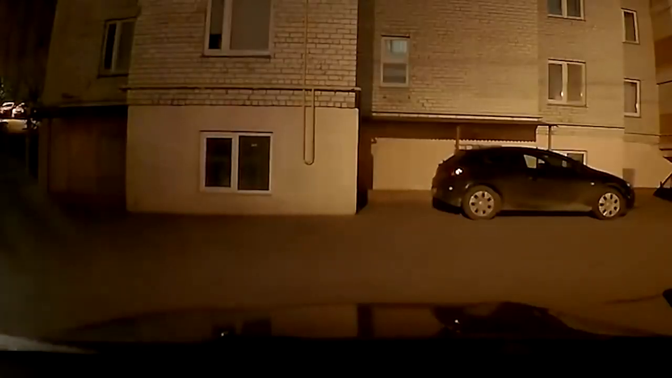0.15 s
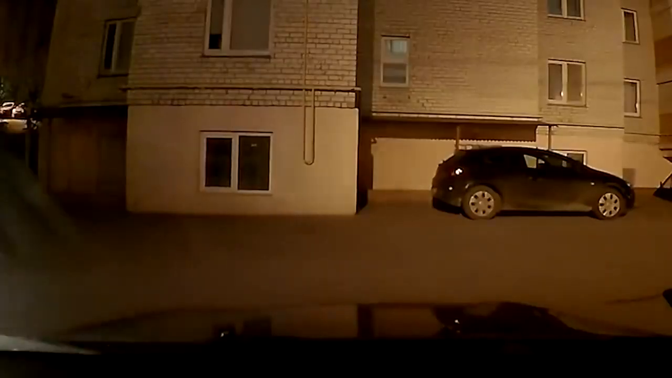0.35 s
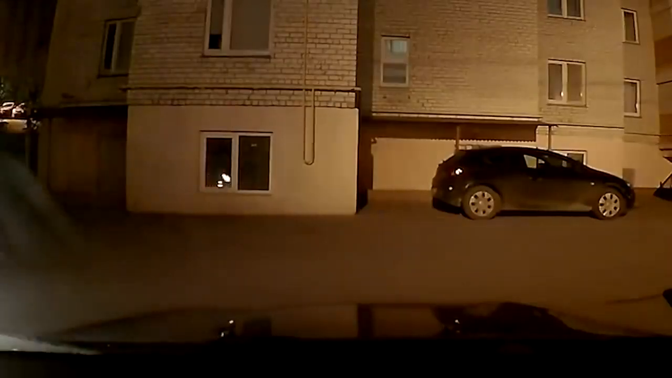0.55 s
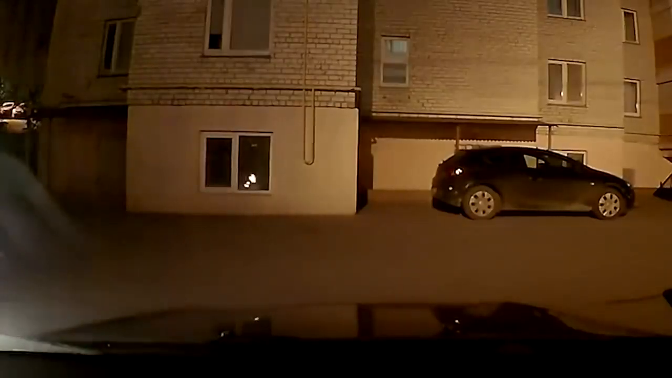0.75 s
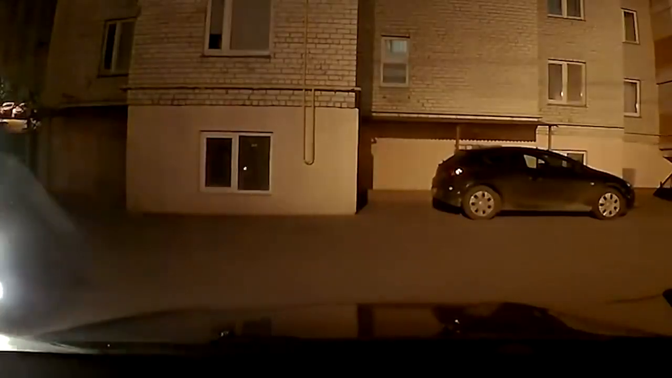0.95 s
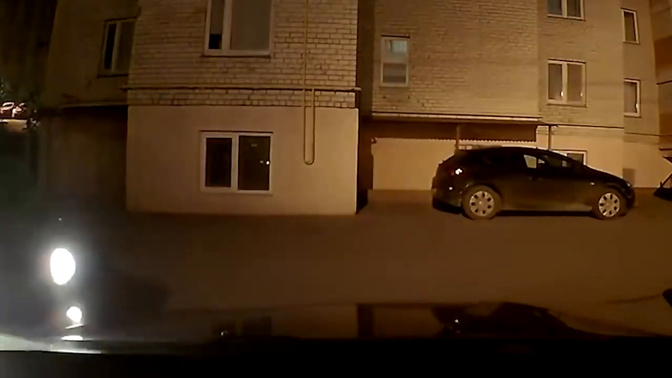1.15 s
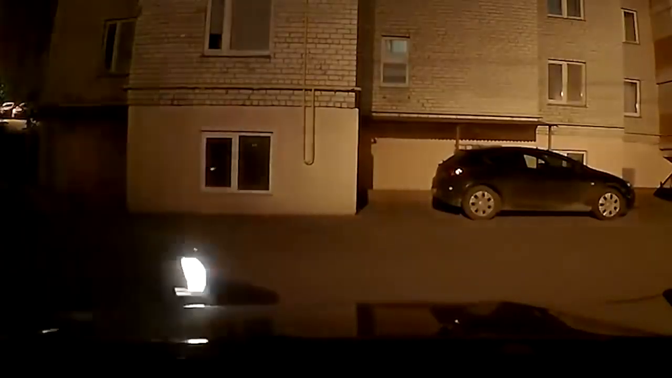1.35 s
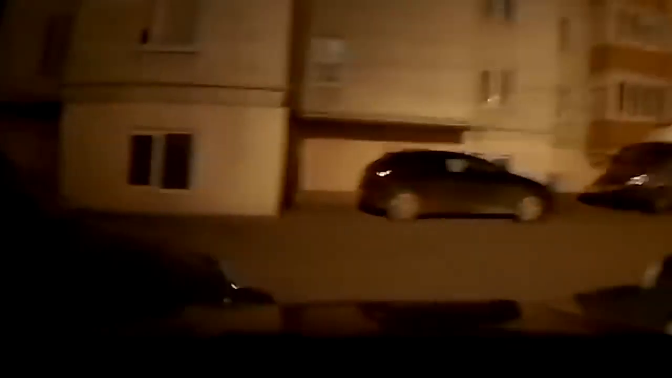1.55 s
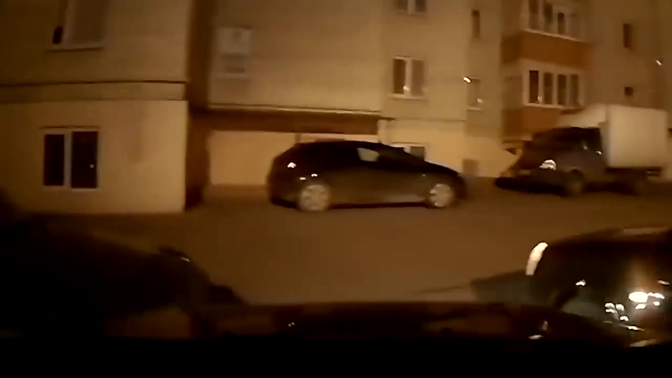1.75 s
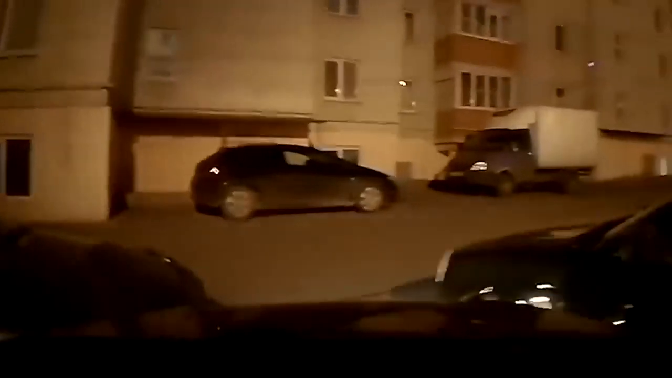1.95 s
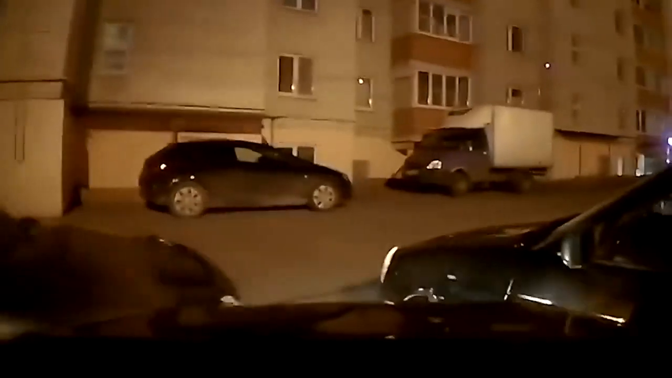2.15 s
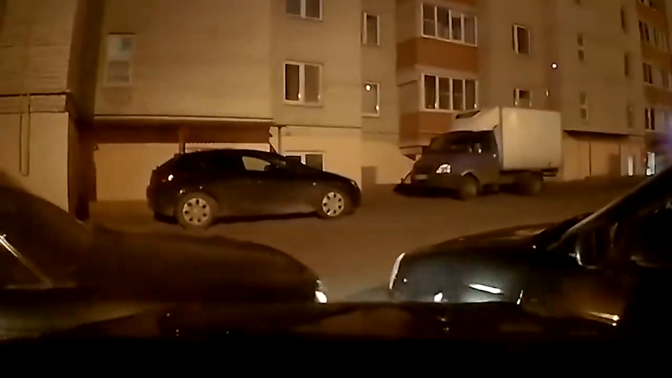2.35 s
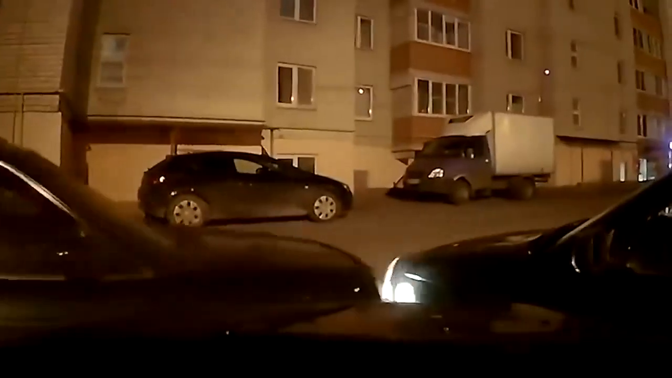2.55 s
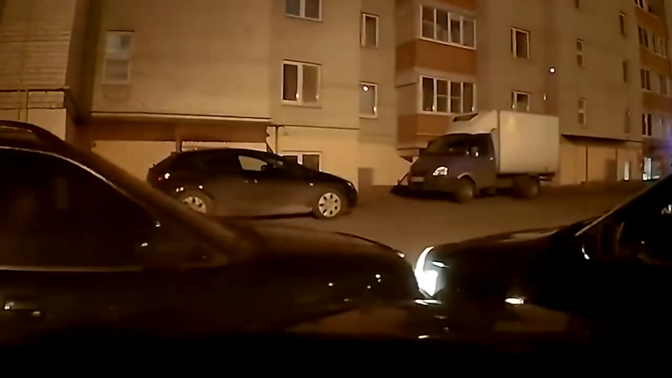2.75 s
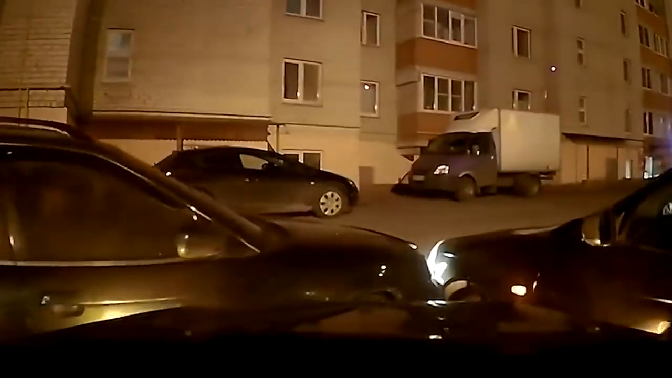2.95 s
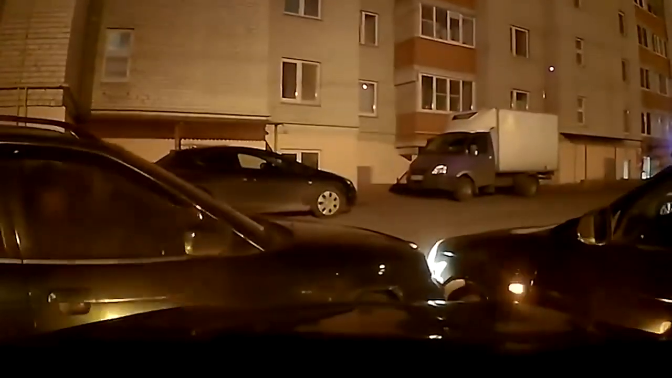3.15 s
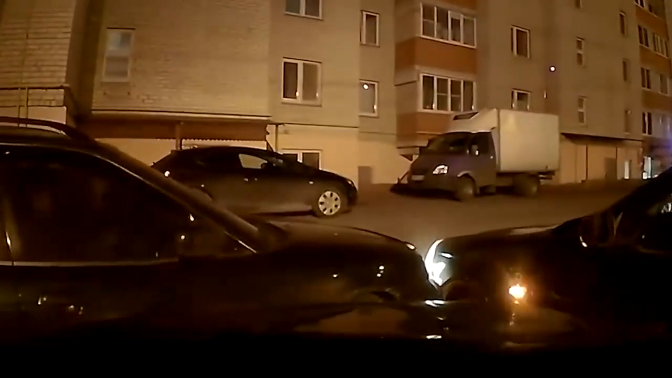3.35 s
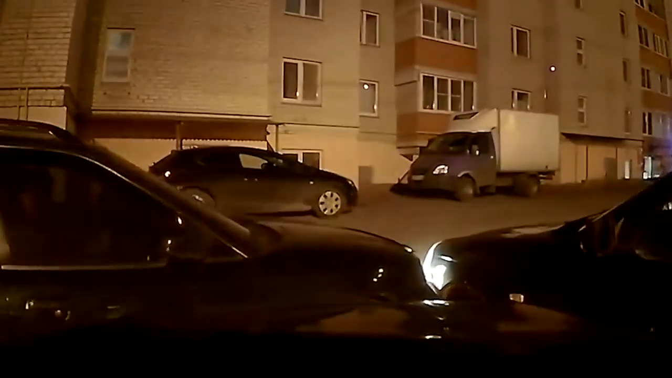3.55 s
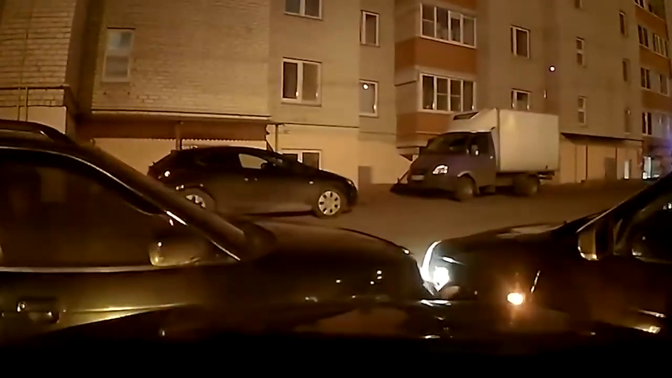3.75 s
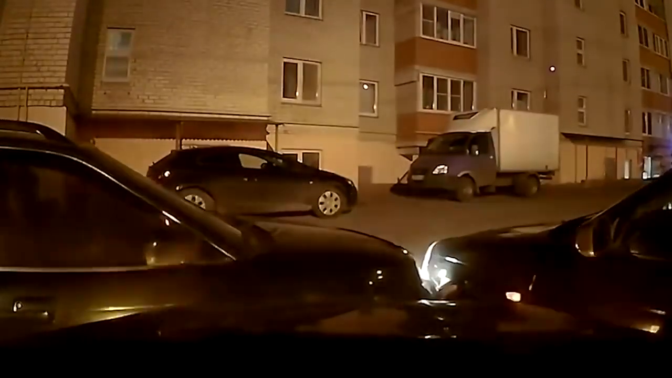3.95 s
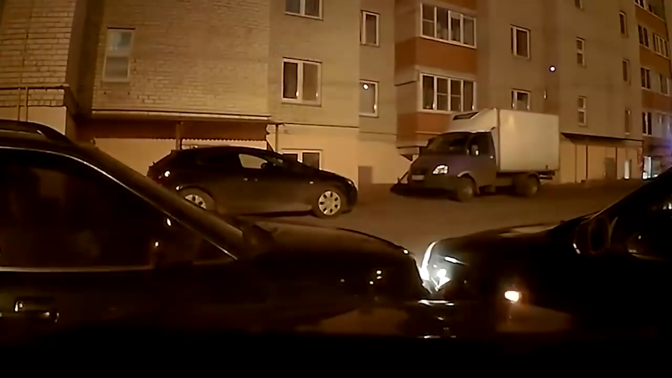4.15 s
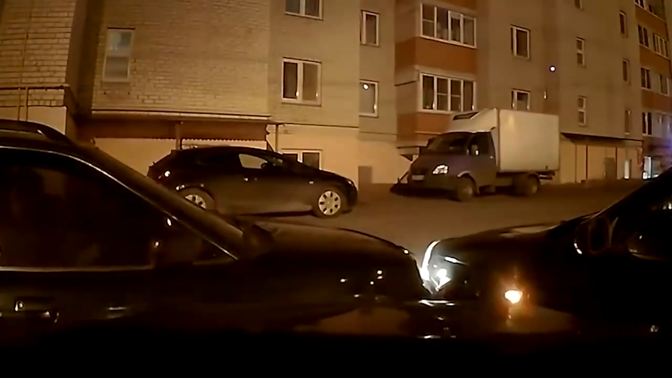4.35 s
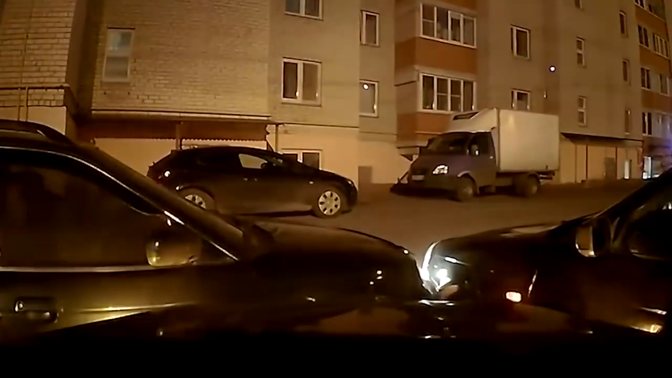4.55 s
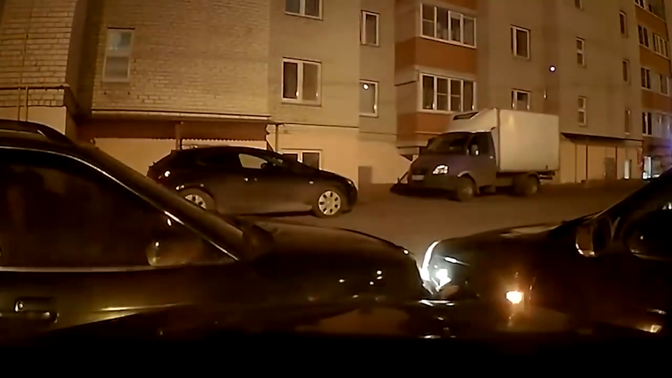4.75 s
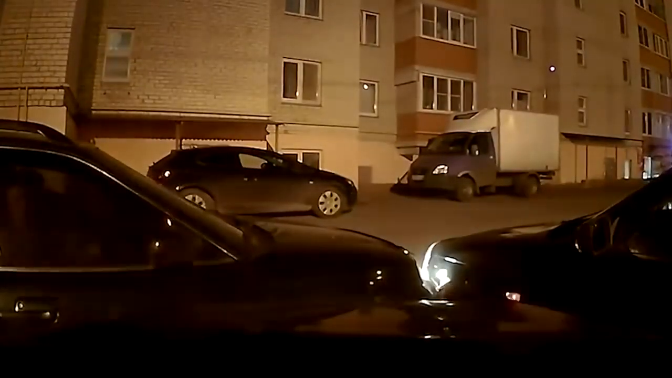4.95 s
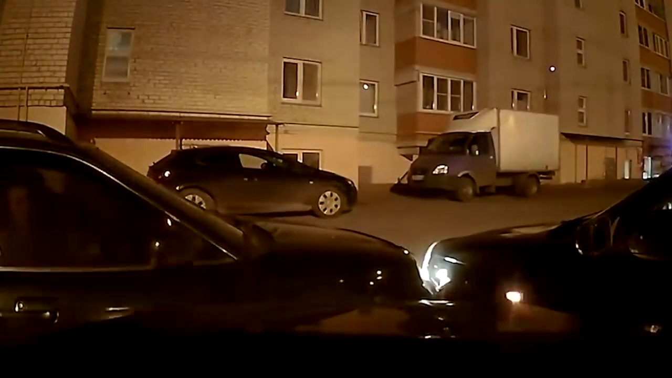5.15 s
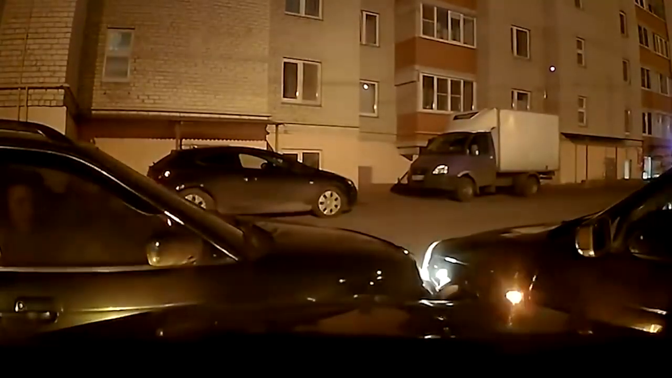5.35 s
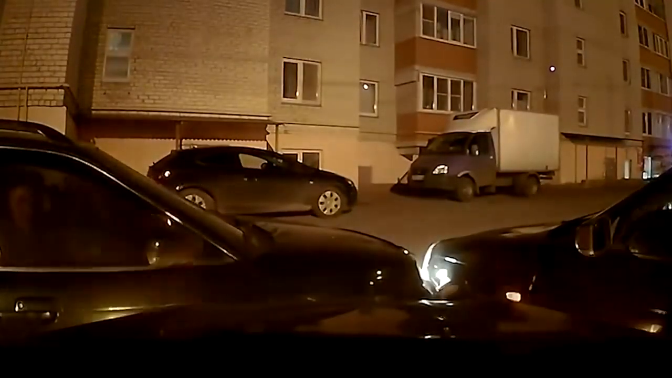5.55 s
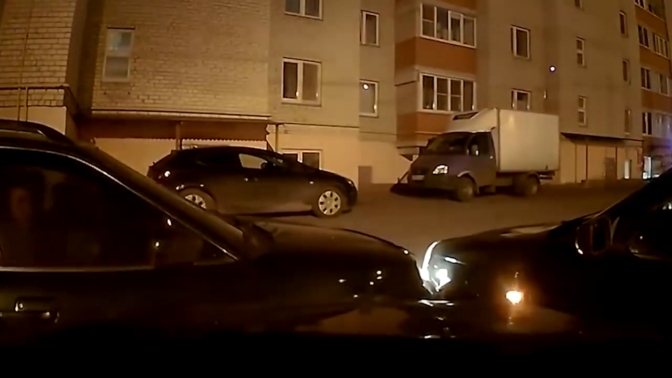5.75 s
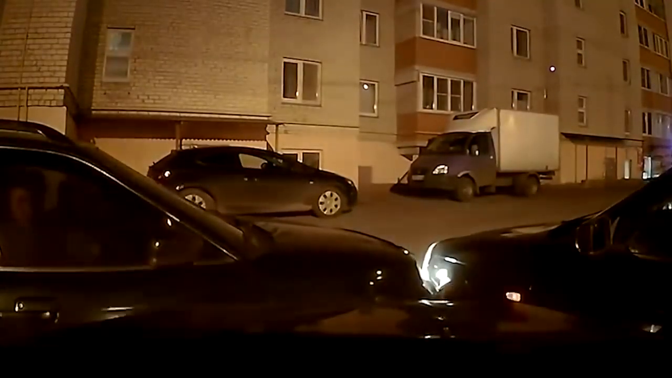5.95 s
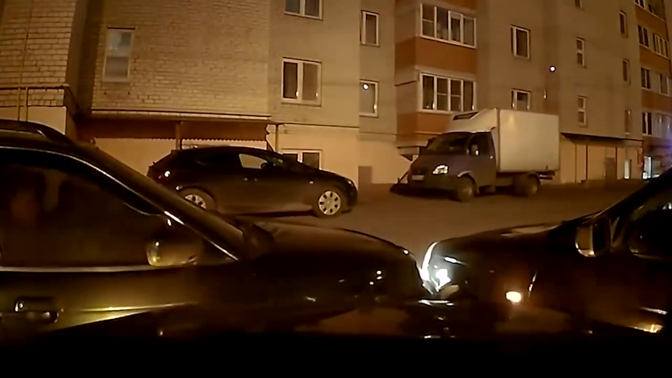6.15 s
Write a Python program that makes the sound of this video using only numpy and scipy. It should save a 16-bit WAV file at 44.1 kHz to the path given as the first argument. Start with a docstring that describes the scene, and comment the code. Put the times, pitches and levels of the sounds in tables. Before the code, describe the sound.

After a second and a half of near-silent night air, a violent car crash crunches and scrapes, then settles into faint hazard-relay ticking.

```python
"""A car rams a parked car at night, heard from the cabin: struck and buckling panels ring body modes.
Debris grinds, plastic cracks in noise bursts, tyres squeal as wavering tones, the cabin booms low.
The input overloads on the peaks. As loose parts settle, the hazard-light relay ticks and tocks
on damped case modes, over filtered-noise night air, an engine rumble, a whirr and a thin whine."""
import sys
import numpy as np
from scipy import signal
from scipy.fft import rfft, irfft
from scipy.io import wavfile
from scipy.ndimage import uniform_filter1d

SR = 44100
rng = np.random.default_rng(int(sys.argv[2]) if len(sys.argv) > 2 else 0)


def master(y):
    """Save y as 16-bit WAV."""
    cut = np.clip(np.atleast_2d(y).T, -1, 1)
    pcm = np.round(cut * 32767)  # scale
    wavfile.write(sys.argv[1], SR, pcm.astype(np.int16))


N = 273861
T_S = np.arange(N) / SR
BURST_T_S = np.arange(int(0.25 * SR)) / SR   # time axis of one short event


def from_db(db):
    """Decibels to gain."""
    return 10 ** (np.asarray(db) / 20)


def rms_one(x):
    """Scale to unit rms."""
    return x / np.sqrt(np.mean(x ** 2) + 1e-20)


def in_time(rows, silent_db=None):
    """Interpolate the columns of a curve table to one value a sample."""
    s, *columns = np.transpose(rows)
    return [np.interp(T_S, s, column, silent_db, silent_db) for column in columns]


def drift(rate_hz):
    """Slow random wander, rms 1: two-pole low-passed noise, computed every 40 samples."""
    r = np.exp(-80 * np.pi * rate_hz / SR)
    noise = rng.standard_normal(N // 40 + 2002)
    slow = signal.lfilter([1], [1, -2 * r, r * r], noise)[2000:]
    return np.interp(np.arange(N) / 40, np.arange(len(slow)), rms_one(slow))


def band(x, low_hz, high_hz, order=2):
    """Butterworth band-pass."""
    return signal.sosfilt(signal.butter(order, [low_hz, high_hz], "band", fs=SR, output="sos"), x)


def ring(force, hz, t60_s):
    """Damped mode: a unit click starts a decaying sine of height 1."""
    r, w = from_db(-60 / (t60_s * SR)), 2 * np.pi * hz / SR
    return signal.lfilter([0, np.sin(w)], [1, -2 * r * np.cos(w), r * r], force + 1e-18)


def rung(force, hz, t60_s):
    """A mode rung by a short force, peak 1."""
    sound = ring(force, hz, t60_s)
    return sound / np.max(np.abs(sound))


def resonance(x, hz, width_hz):
    """Two-pole resonance, peak gain 1."""
    r = np.exp(-np.pi * width_hz / SR)
    poles = [1, -2 * r * np.cos(2 * np.pi * hz / SR), r * r]
    return signal.lfilter([(1 - r * r) / 2, 0, (r * r - 1) / 2], poles, x)


def coloured(x, spectrum):
    """Filter by a spectrum table, interpolated over log frequency; rms 1."""
    hz = np.maximum(np.fft.rfftfreq(N, 1 / SR), 1)
    points = np.array(spectrum)
    gain_db = np.interp(np.log(hz), np.log(points[:, 0]), points[:, 1])
    return rms_one(irfft(rfft(x) * from_db(gain_db), N))


def grains(per_s, spread_db):
    """Random clicks of uneven size and sign; rms 1."""
    sizes = from_db(spread_db * np.minimum(rng.exponential(1, N), 5)) * rng.choice([-1, 1], N)
    return rms_one(sizes * (rng.random(N) < per_s / SR))


def add(out, s, sound):
    """Mix a sound in at s seconds."""
    i = round(s * SR)
    out[i:i + len(sound)] += sound[:N - i]


def burst(t60_s, rise_s):
    """Envelope of a quick rise and an exponential fall."""
    return (1 - np.exp(-BURST_T_S / rise_s)) * from_db(-60 * BURST_T_S / np.clip(t60_s, 0.01, 0.5))


def shell(panel_db):
    """Buckling kicks and single blows ring the same body modes; the lowest belong to the floor pan."""
    # body modes: (frequency [Hz], relative level [dB], t60 before scaling [s])
    body_modes = [(77.8, -3.5, 0.17), (133, 1, 0.14), (168.7, 2, 0.11), (257.3, -2, 0.13),
                  (297, -4.5, 0.11), (350.6, -3, 0.085), (408.2, -2.5, 0.063), (508.2, -3.5, 0.082),
                  (659, -6.5, 0.064), (815, -7.5, .08)]
    # blows: (time [s], panels level [dB], floor-pan level [dB], spot frequency [Hz], ring length factor)
    blows = [(1.612, -28, -25, 248, 1.8), (1.641, -7.5, -24, 250, 2.1), (1.665, -1.5, -22, 350, 1.04),
             (1.721, -24, -20, 223, 1.4), (1.821, -25, -34.5, 304, 0.71), (2.004, -20, -44.5, 277, 0.92),
             (2.063, -20.5, -35, 283, 0.18), (2.125, -18, -28, 371, 1.3), (2.264, -23, -29, 266, 1.66),
             (2.413, -30.5, -37.5, 342, 2.7), (2.531, -19.5, -18, 261, 0.56), (2.56, -21, -27.5, 202, 2.1),
             (2.783, -19.5, -53, 275, 1.7), (2.808, -24.5, -23.5, 248, 1.96), (3.037, -40, -45, 205, 0.79),
             (3.101, -31, -56, 301, 0.25), (3.278, -37.5, -62, 242, 0.73), (3.418, -38, -55.5, 433, 1.45),
             (3.636, -46.5, -67.5, 275, 1.7), (3.955, -47.5, -63, 256, 1.08),
             (4.944, -55.5, -52.5, 347, 1.1), (5.264, -62, -56.5, 202, 1.08)]
    floor_pan_hz = 200   # modes below this are floor pan
    pan_db, panels_mean_db, pan_follows = -35, -37, 1.12   # the pan swings wider than the panels
    pan_fade_db_per_s = 4.0   # the pan settles sooner

    kicks = grains(1500, 2.2)
    pan, panels = np.zeros(N), np.zeros(N)
    for k, (hz, db, t60_s) in enumerate(body_modes):
        part = pan if hz < floor_pan_hz else panels
        part += from_db(db) * ring(np.roll(kicks, 5003 * k), hz, 0.27 * t60_s)
    pan_level_db = pan_db + pan_follows * (panel_db - panels_mean_db)
    pan_level_db += 1.5 * drift(8) - pan_fade_db_per_s * (T_S - 2)
    out = from_db(pan_level_db) * rms_one(pan)
    out += from_db(panel_db + 2.5 * drift(22)) * rms_one(panels)

    # soft, crumpling contact
    contacts = rng.standard_normal((len(blows), len(BURST_T_S))) * burst(0.046, 0.0033)
    for (s, panels_db, thump_db, spot_hz, length), crumple in zip(blows, contacts):
        for hz, db, t60_s in body_modes:
            if hz < floor_pan_hz:
                blow_db = thump_db - 2.0
            else:   # weaker away from the frequency the spot favours
                blow_db = panels_db - 4.5 - 10.0 * abs(np.log2(hz / spot_hz))
            add(out, s, from_db(db + blow_db) * rung(crumple, hz, length * t60_s))
    return out


def debris(grind_db):
    """Dense grit grinds between the cars, loose bits rattle in it; fine splinters make the top."""
    # grit spectrum: (frequency [Hz], relative level [dB])
    grit_spectrum = [(350, -35.5), (600, -11), (914, -4), (998, -2.5), (1260, -9), (1900, -15),
                     (2450, -7.5), (3530, -17), (4920, -19), (6340, -20), (6930, -16), (7740, -25),
                     (8460, -27), (11000, -70.5), (18600, -120)]
    splinters_db, grind_mean_db, splinters_follow = -48.5, -39.5, 1.1   # splinters swing a little wider
    splinters_fade_db_per_s = 4.0   # fewer splinters are left as the shove goes on

    grit = coloured(grains(5000, 2.9), grit_spectrum) * from_db(2.3 * drift(33))
    knocks = (rng.random(N) < 60 / SR) * rng.random(N)
    bits = signal.lfilter([1], [1, -from_db(-60 / (0.052 * SR))], knocks)   # t60 0.052 s
    grit = grit * (1 + 0.8 * bits)
    middle = rms_one(band(grit, 700, 3800, order=3))
    top = rms_one(band(grit, 4700, 9000, order=3))
    top_db = splinters_db + splinters_follow * (grind_db - grind_mean_db)
    top_db -= splinters_fade_db_per_s * (T_S - 2)
    return from_db(grind_db) * middle + from_db(top_db) * top


def shards(grind_db):
    """Small pieces of metal and lamp glass clink: random hits ring 18 modes as the debris grinds."""
    hits, dealt = grains(230, 1.2), rng.integers(0, 18, N)
    clinks = np.zeros(N)
    for k, hz in enumerate(np.geomspace(2100, 4400, 18)):
        clinks += ring(hits * (dealt == k), hz, 130.0 / hz)
    return from_db(grind_db - 10.0) * rms_one(clinks)


def cracks():
    """Plastic and trim crack: a snap and a spray of clicks in a broad resonance, with a splintery top. The
    burst at 2.965 s is no crack: it brightens the relay's first tick."""
    # (time [s], level before offset [dB], middle [Hz], splinter level before offset [dB], t60 [s])
    crack_rows = [(1.611, -39, 2370, -85, 0.092), (1.632, -23, 2550, -58, 0.21),
                  (1.6446, -16.5, 1460, -31, 0.28), (1.665, -17, 2540, -29, 0.14),
                  (1.72, -21, 2280, -26, 0.21), (1.7335, -29, 2640, -27, 0.11),
                  (1.7479, -19.5, 3000, -22, 0.072), (1.7828, -22.5, 2300, -29, 0.09),
                  (1.8179, -20.5, 2680, -25.5, 0.11), (1.832, -21.5, 2380, -27.5, 0.14),
                  (1.8481, -19.5, 1500, -34, 0.086), (1.9134, -23.5, 2230, -53, 0.041),
                  (1.936, -25, 2300, -36, 0.31), (1.9692, -12, 4550, -27, 0.03),
                  (1.985, -15, 2940, -20.5, 0.058), (2.002, -21, 1570, -34, 0.067),
                  (2.0489, -20.5, 2500, -25, 0.07), (2.094, -25.5, 2350, -40, 0.12),
                  (2.1269, -19, 2620, -27.5, 0.054), (2.1985, -22, 2850, -24.5, 0.097),
                  (2.2536, -32, 2800, -54, 0.06), (2.3121, -22.5, 2640, -28.5, 0.16),
                  (2.3398, -16, 2640, -23, 0.042), (2.4551, -33.5, 2900, -72, 0.14),
                  (2.534, -14.5, 1610, -12, 0.044), (2.5611, -28, 1690, -27.5, 0.15),
                  (2.614, -38, 3170, -43, 0.079), (2.6817, -21.5, 2420, -68, 0.056),
                  (2.7617, -41, 2160, -76, 0.051), (2.7937, -28, 2850, -68, 0.087),
                  (2.809, -24.5, 2530, -77, 0.062), (2.965, -44, 3000, -47, 0.078),
                  (3.103, -49, 2400, -68, 0.054), (3.1448, -47, 2750, -67, 0.05),
                  (3.19, -59, 2900, -60, 0.051), (3.215, -45, 2690, -75, 0.072),
                  (3.265, -57, 2880, -50, 0.42), (3.315, -48.5, 3060, -45.5, 0.22),
                  (3.3308, -42, 1510, -63, 0.074), (3.4062, -55, 2100, -75, 0.071),
                  (3.457, -59, 2100, -67, 0.055), (3.4918, -53, 2140, -76.5, 0.068),
                  (3.565, -56, 2290, -72, 0.056), (3.9446, -51, 2166, -77, 0.059)]
    out = np.zeros(N)
    spray = rng.laplace(size=(len(crack_rows), len(BURST_T_S)))
    spray[:, 30] = 10.0   # the snap
    for (s, level_db, hz, splinter_db, t60_s), clicks in zip(crack_rows, spray):
        body = resonance(clicks, hz, 450.) + 0.27 * clicks
        middle = rms_one(band(body, 800, 5200, order=4))
        top = rms_one(band(clicks, 4700, 8800, order=3))
        mix = from_db(level_db - 11.5) * middle + from_db(splinter_db - 10) * top
        add(out, s, burst(t60_s, 0.0008) * mix)
    return out


def tyres():
    """Rubber sticks and slips sideways: a wavering squeal with a weak octave, a second tyre higher."""
    # scrubbing: (time [s], level [dB])
    scrub = [(1.72, -35.5), (1.8, -43), (1.95, -44), (2.0, -38), (2.036, -51), (2.068, -38), (2.2, -33.5),
             (2.268, -33.5), (2.3, -43), (2.4, -51.5)]
    first_hz, second_hz = 1004, 1149
    level_db, = in_time(scrub, -120)
    first = 2 * np.pi * np.cumsum(first_hz * (1 + 0.024 * drift(30))) / SR
    second = 2 * np.pi * np.cumsum(second_hz * (1 + 0.025 * drift(30))) / SR
    squeal = np.sin(first) + 0.18 * np.sin(2 * first)
    squeal += 0.45 * from_db(3.5 * drift(6.7)) * np.sin(second)
    return from_db(level_db + 2.4 * drift(60)) * squeal


def squeaks():
    """Metal rubs metal: an unsteady gliding tone, and friction noise in a narrow resonance round it."""
    # (start [s], end [s], start frequency [Hz], end frequency [Hz], starting level [dB])
    rubs = [(1.761, 1.801, 6710, 6710, -41), (2.617, 2.668, 3186, 3186, -46),
            (2.887, 3.07, 2040, 2090, -53.5)]
    fade_db_per_s = 45.0
    out, friction, waver = np.zeros(N), grains(4000, 2.5), drift(50)
    for start, end, first_hz, last_hz, db in rubs:
        at = slice(round(start * SR), round(end * SR))
        n = at.stop - at.start
        glide_hz = np.linspace(first_hz, last_hz, n) + 35. * waver[at]
        tone = np.sin(2 * np.pi * np.cumsum(glide_hz) / SR)
        middle_hz = (first_hz + last_hz) / 2
        narrow = resonance(resonance(friction, middle_hz, 100.0), middle_hz, 200.)
        rough = 0.62 * rms_one(narrow[at])
        level = from_db(db - fade_db_per_s * np.arange(n) / SR) * signal.windows.tukey(n, 0.25)
        out[at] += level * (tone + rough)
    return out


def cabin():
    """The cabin air booms on a wandering low tone as the car is loaded; the suspension shakes with it."""
    # boom: (time [s], mean frequency [Hz], level [dB])
    boom = [(1.6, 40, -59.5), (1.66, 38.8, -22), (1.72, 38.6, -15), (1.81, 43.6, -30.5), (1.9, 47.1, -25),
            (2.0, 45.6, -31.5), (2.17, 49.8, -27.5), (2.36, 46.8, -27), (2.5, 44.1, -34.5),
            (2.62, 54.7, -32), (2.7, 49.9, -41), (2.8, 44.4, -36), (2.96, 50.2, -35.5), (3.1, 41.94, -46.5),
            (3.35, 45.6, -60), (4.25, 56, -69)]
    hz, boom_db = in_time(boom)[0], in_time(boom, -120)[1]
    tone = np.sin(2 * np.pi * np.cumsum(hz * (1 + 0.09 * drift(8))) / SR)
    shake = rms_one(band(rng.standard_normal(N), 22, 60))
    return from_db(boom_db) * (1.15 * from_db(2.5 * drift(9)) * tone + 0.12 * shake)


def relay():
    """The contact rings the case alike each cycle, brighter on pull-in than drop-out, with a dry snap."""
    # case modes: (frequency [Hz], relative pull-in level [dB], relative drop-out level [dB], t60 [s])
    case_modes = [(908, -6.5, -2, 0.073), (1046, -28, -4, 0.1), (1118, -8, -23, 0.079),
                  (2850, -1, -19, 0.044), (3040, -9, -8, 0.032), (3630, -2.5, -35, 0.027),
                  (3880, -9, -24, 0.088), (5200, -33, -28, .03), (6300, -5, -12.5, 0.036),
                  (6520, -6, -26, 0.011), (6400, 2, -17, 0.032), (7500, -23, -5, 0.026)]
    start_s, cycle_s, on_s = 2.9635, 0.7927, 0.398   # first pull-in, blink period, lamp-on time
    tick_db, tock_db, fade_db_per_s = -51.5, -54, 1.7   # gains of the first cycle, then fading
    bounce_s = 0.0026   # contact bounce builds the ring up

    snaps = rms_one(band(rng.standard_normal((2, len(BURST_T_S))), 1000, 8600)) * burst(0.08, 0.0015)
    tick, tock = from_db(-1.0) * snaps[0], from_db(-10.5) * snaps[1]
    phases = rng.uniform(0, 2 * np.pi, len(case_modes))
    for (hz, pull_in_db, drop_out_db, t60_s), phase in zip(case_modes, phases):
        mode = np.sin(2 * np.pi * hz * BURST_T_S + phase) * burst(t60_s, bounce_s)
        tick += from_db(pull_in_db + 4.0) * mode
        tock += from_db(drop_out_db + 5.5) * mode

    out = np.zeros(N)
    for s in np.arange(start_s, N / SR, cycle_s):
        fade_db = fade_db_per_s * (s - start_s)
        add(out, s, from_db(tick_db - fade_db) * tick)
        if s + on_s < N / SR:
            add(out, s + on_s, from_db(tock_db - fade_db) * tock)
    return out


def whirr():
    """A faint far-off whirr swells in the quiet: noise in a few narrow bands."""
    # swell: (time [s], level [dB])
    swell = [(4.3, -89), (4.9, -85), (5.9, -83.5), (6.21, -87)]
    # bands: (frequency [Hz], width [Hz], relative level [dB])
    whirr_bands = [(477, 12, -2.5), (975, 40, -4.5), (2680, 150, -1.5), (3550, 90, -9)]
    white, bands = rng.standard_normal(N), np.zeros(N)
    for hz, width_hz, db in whirr_bands:
        bands += from_db(db) * rms_one(resonance(white, hz, width_hz))
    return from_db(in_time(swell, -120)[0] + 1.5 * drift(4.6)) * bands


def night():
    """Broad quiet air (shaped noise), a distant engine (noise near 60 and 128 Hz) and a thin whine."""
    # air spectrum: (frequency [Hz], relative level [dB])
    air_spectrum = [(15, -32.5), (25, -3.5), (48, -1), (75, -3.5), (163, -10.5), (241, -10), (443, -17.5),
                    (609, -16.5), (671, -20), (1360, -28), (2500, -31), (4280, -38), (6960, -39.5),
                    (7490, -39.5), (8460, -39.5), (11000, -72), (18600, -120)]
    # distant engine: (time [s], level [dB])
    rumble = [(0.0, -70), (0.3, -60), (0.6, -74), (0.84, -70), (1.2, -66), (1.5, -72), (4.55, -74),
              (4.92, -65.5), (5.34, -73), (6.21, -74.5)]
    # steady whine: (frequency [Hz], rms level [dB])
    whine_tones = [(7663, -95), (7722, -94), (8280, -102), (8340, -104)]
    air_db = -78   # rms within 700-4000 Hz

    air = coloured(rng.standard_normal(N), air_spectrum)
    air = from_db(air_db) * air / np.std(band(air, 700, 4000, order=4))
    white = rng.standard_normal(N)
    low = resonance(resonance(white, 60, 13.0), 60, 25.)
    octave = resonance(resonance(white, 128, 16.), 128, 30.)
    engine = from_db(in_time(rumble)[0]) * rms_one(low + 0.36 * octave)
    whine = sum(from_db(db) * np.sqrt(2) * np.sin(2 * np.pi * hz * T_S) for hz, db in whine_tones)
    return air + engine + whine


def scene():
    """The crash, its aftermath and the night; buckling and grinding share the course of the shove."""
    # shove, first touch to rest: (time [s], buckling panels level [dB], grinding debris level [dB])
    shove = [(1.598, -90, -100), (1.612, -37, -49.5), (1.655, -17, -25.5), (1.72, -28.5, -35.5),
             (1.8, -37.5, -42), (1.85, -34.5, -41.5), (1.93, -40.5, -42), (2.14, -34, -41),
             (2.33, -36, -39.5), (2.4, -44, -61.5), (2.47, -37, -52), (2.522, -41.5, -50.5),
             (2.545, -25.5, -39), (2.66, -46.5, -55), (2.72, -42, -59.5), (2.82, -33, -50.5),
             (2.95, -54, -56), (3.11, -45.5, -62), (3.25, -54.5, -63), (3.45, -59, -71), (3.87, -69, -81),
             (4.03, -63, -80), (4.25, -84.5, -89)]
    panel_db, grind_db = in_time(shove, -120)
    crash = shell(panel_db) + debris(grind_db) + shards(grind_db)
    crash += cracks() + tyres() + squeaks() + cabin()
    return (crash + relay() + whirr() + night())[None]


def record(dry):
    """Input overload, brief treble dropouts, a top cut with a faint mirror image above it, and hiss."""
    # treble dropouts: (start [s], end [s])
    dull_spans = [(1.600, 1.663), (2.500, 2.558), (3.715, 3.775), (6.085, 6.140)]
    overload, dull_hz, cutoff_hz = 0.385, 4700, 8620   # overload: limiting amplitude

    x = overload * np.tanh((np.abs(dry) / overload) ** 4) ** 0.25 * np.sign(dry)
    low = signal.sosfiltfilt(signal.cheby2(10, 40, dull_hz * 1.03, fs=SR, output="sos"), x)
    dull = sum((T_S > start) & (T_S < end) for start, end in dull_spans) * 1.0
    treble = (1 - uniform_filter1d(dull, size=130)) * (x - low)   # edges smoothed over 3 ms
    top_cut = signal.cheby2(12, 45, cutoff_hz * 1.04, fs=SR, output="sos")
    cut = signal.sosfilt(top_cut, low + treble)
    # a carrier at twice the cutoff mirrors the treble about it
    image = 2 * np.cos(4 * np.pi * cutoff_hz * T_S) * band(cut, 4900, 8400, order=4)
    above = from_db(-30) * band(image, 8900, 12600, order=6)
    return cut + above + from_db(-96.0) * rng.standard_normal(N)


dry = scene()
out = record(dry)
master(out)
```